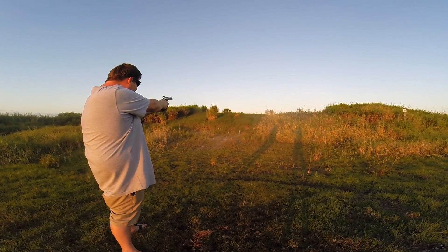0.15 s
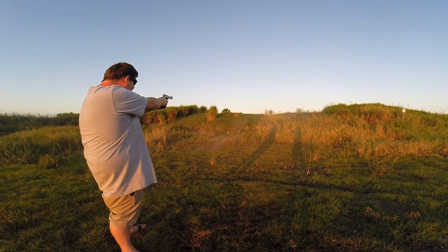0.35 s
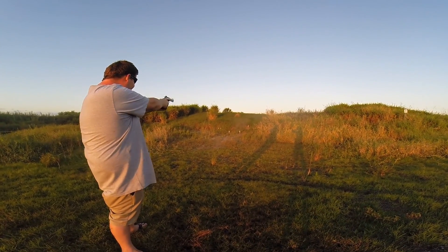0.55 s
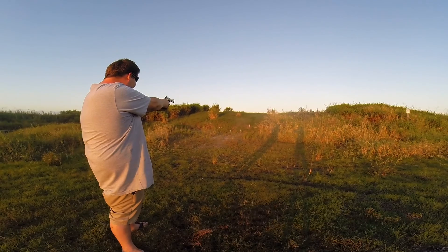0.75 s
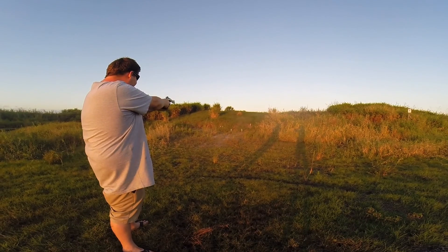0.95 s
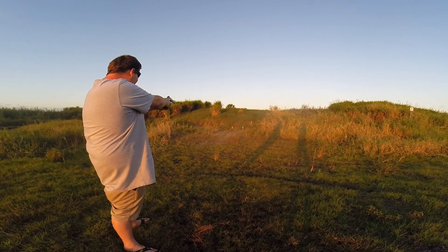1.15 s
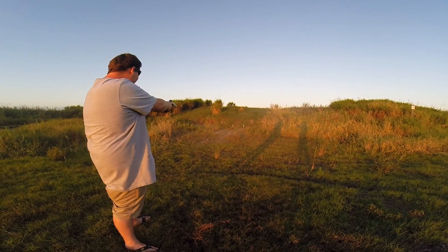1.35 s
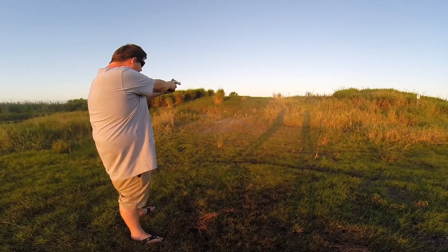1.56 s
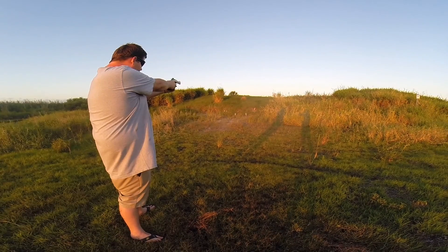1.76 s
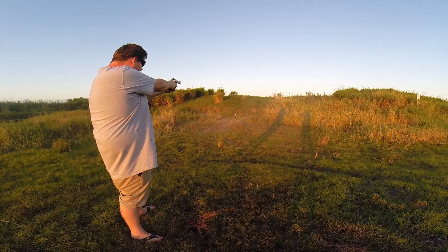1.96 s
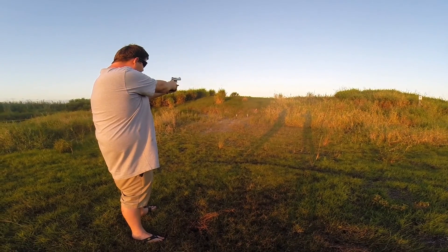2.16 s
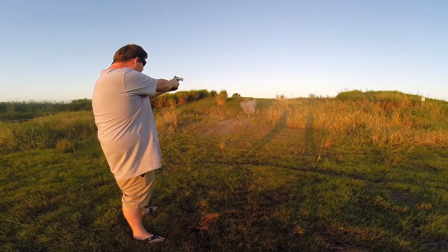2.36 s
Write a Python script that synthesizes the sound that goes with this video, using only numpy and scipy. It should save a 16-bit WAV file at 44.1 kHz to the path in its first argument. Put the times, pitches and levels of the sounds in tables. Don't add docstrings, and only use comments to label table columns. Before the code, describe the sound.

A pistol fires near a small outdoor microphone, its harsh crack distorting and then rolling away as a dull echo. Quiet breeze, a thin insect and a few birds follow before a second similar shot.

```python
import sys
import numpy as np
from scipy import signal
from scipy.io import wavfile

SR = 44100
rng = np.random.default_rng(int(sys.argv[2]) if len(sys.argv) > 2 else 0)


def volts_from_db(level):
    exponent = np.asarray(level, float) / 20
    return 10 ** exponent


def wav_out(sig):
    wavfile.write(sys.argv[1], SR, np.round(np.clip(np.atleast_2d(sig).T, -1, 1) * 32767).astype(np.int16))


N = 110250
T = np.arange(N) / SR
COARSE_STEP = 40
COARSE = np.arange(N // COARSE_STEP + 2) * COARSE_STEP / SR

# (time [s], housing ring [dB], middle swing [dB], low gas swing [dB], low swing crest delay [s])
SHOTS = [
    (0.2152, 8.5, -8, -1.5, 0.0065),
    (2.2041, -3, 0.5, 0, .0041),
]


def rms_one(x):
    return x / np.sqrt(np.mean(x ** 2) + 1e-20)


def at_hz(points, hz):
    table_hz, values = np.array(points).T
    return np.interp(np.log(hz), np.log(table_hz), values)


def fine(slow):
    return np.interp(T, COARSE, slow)


def drift(rate_hz):
    r = np.exp(-2 * np.pi * rate_hz * COARSE_STEP / SR)
    white = rng.standard_normal(len(COARSE) + 2000)
    return rms_one(signal.lfilter([1], [1, -2 * r, r * r], white)[2000:])


def band(x, low_hz, high_hz):
    sos = signal.butter(2, [low_hz, min(high_hz, .46 * SR)], "band", fs=SR, output="sos")
    return signal.sosfilt(sos, x)


def ring(clicks, hz, t60_s):
    r, w = volts_from_db(-60 / (t60_s * SR)), 2 * np.pi * hz / SR
    return signal.lfilter([0, np.sin(w)], [1, -2 * r * np.cos(w), r * r], clicks + 1e-18)


def swell(t, rise_s, hold_s, t60_s):
    return np.clip(t / rise_s, 0, 1) * volts_from_db(-60 * np.clip(t - rise_s - hold_s, 0, None) / t60_s)


def bank_of_noise(gain_at):
    white = rng.standard_normal((2, N + 8000))
    edges_hz = 20 * 2 ** (np.arange(30) / 3)
    out = np.zeros(N)
    for k, (low_hz, high_hz) in enumerate(zip(edges_hz, edges_hz[1:])):
        gain = fine(gain_at(np.sqrt(low_hz * high_hz)))
        out += gain * band(white[k % 2], low_hz, high_hz)[-N:]
    return out


def per_hz(spectrum, hz):
    grid_hz = np.linspace(20, SR / 2, 2000)
    return volts_from_db(at_hz(spectrum, hz)) / np.sqrt(np.mean(volts_from_db(at_hz(spectrum, grid_hz)) ** 2))


def housing(x):
    # (frequency [Hz], width [Hz], level [dB])
    resonances = [(1260, 230, -3), (2430, 450, -7)]
    out = x
    for hz, width_hz, db in resonances:
        r = np.exp(-np.pi * width_hz / SR)
        b = (1 - r * r) / 2
        a = [1, -2 * r * np.cos(2 * np.pi * hz / SR), r * r]
        out = out + volts_from_db(db) * signal.lfilter([b, 0, -b], a, x)
    return out


def air():
    # (frequency [Hz], level [dB])
    air_spectrum = [(15, -34), (25, -4), (75, 1), (113, -8), (1300, -26.5), (2770, -28.5), (8130, -39),
                    (8810, -37.5), (15500, -57)]
    # (time [s], level [dB])
    gust_levels = [(0.0, -56.5), (0.25, -57), (0.53, -61.5), (1.13, -56.5), (1.32, -54), (1.66, -58),
                   (2.12, -55.5), (2.34, -61.5), (2.5, -62.5)]
    # (frequency [Hz], gain [dB])
    duck_depth = [(40, -9.5), (150, -0.5), (1000, -5), (4000, -3), (10000, -16)]
    air_db, duck_hold_s, duck_release_s = -52.5, 0.52, 0.23
    insect_hz, insect_width_hz, insect_db = 9010, 120, -73
    t = COARSE
    ducked = np.zeros(len(t))
    for s, *_ in SHOTS:
        release = np.clip(1 - (t - s - duck_hold_s) / duck_release_s, 0, 1)
        ducked += np.clip((t - s) / .01, 0, 1) * release
    gust_db = np.interp(t, *np.transpose(gust_levels))
    wind_db = gust_db - gust_db.mean() + 2.5 * drift(9)

    def gain(hz):
        wind_share = at_hz([(120, 0.99), (500, .1)], hz)
        db = air_db + at_hz(duck_depth, hz) * ducked + 1.2 * drift(6) + wind_share * wind_db
        return per_hz(air_spectrum, hz) * volts_from_db(db)

    hiss = bank_of_noise(gain)
    white = rng.standard_normal(N)
    song = rms_one(band(white, insect_hz - insect_width_hz, insect_hz + insect_width_hz))
    resumed = np.clip((t - 1.1) / .5, 0, 1)
    startled_db = np.where(t < .3, -3, -7 * (2 - resumed))
    song_db = insect_db + 1.5 * drift(25) + at_hz(duck_depth, insect_hz) * ducked + startled_db
    return hiss + song * fine(volts_from_db(song_db))


def ticks():
    # (time [s], peak level [dB], main mode [Hz])
    contacts = [
        (.18355, -31.5, 3530),
        (.20715, -33, 2900),
        (2.17395, -29, 3480),
        (2.19595, -34.5, 2900),
    ]
    # (frequency [Hz], level [dB], t60 [s])
    steel_modes = [(2310, -12.5, .006), (4600, -10, .006), (7500, -8, 0.01), (9300, -11, 0.008),
                   (10500, -9.5, 0.009), (13500, -17, .005), (6000, -14, .005)]
    main_t60_s, spread_s, echo_s, echo_db = .006, .0028, .005, -16
    count = 7
    at = (np.linspace(0, 1, count) ** 1.3 * spread_s * SR).astype(int)
    lag = int(echo_s * SR)
    out = np.zeros(N)
    for s, db, main_hz in contacts:
        i = int(s * SR)
        for hz, mode_db, t60_s in [*steel_modes, (main_hz, 0, main_t60_s)]:
            hit_db = db + mode_db - np.linspace(1, 9, count) + rng.normal(0, 2.5, count)
            clicks = np.zeros(N // 50)
            clicks[at] = volts_from_db(hit_db) * rng.choice([-1, 1], count)
            one = ring(clicks, hz, t60_s)
            out[i:i + len(one)] += one
            out[i + lag:i + lag + len(one)] += volts_from_db(echo_db) * one
    return out


def blast():
    crack_s, crack_db = .0004, 2
    fizz_hz, fizz_db, fizz_t60_s = 4800, -7.5, 0.0092
    body_hz, body_after_s = 1058, 0.0019
    bounce_hz, bounce_after_s, bounce_db, bounce_fizz_db = 1549, .0042, 4.5, -9
    mid_hz, mid_peak_s = 482, 0.0034
    swing_hz, swing_t60_s = 199.6, 0.054
    limit_after_s, limit_db, limit_attack_s = .0062, -20.5, 0.003
    suction_db, suction_s = -12.5, 0.0024
    thud_hz, thud_after_s, thud_db = 403, .0646, -17.5
    tau = 2 * np.pi
    t = T[:SR // 8]
    u, v = t - body_after_s, t - bounce_after_s
    out = np.zeros(N)
    for s, body_db, mid_db, swing_db, swing_peak_s in SHOTS:
        crack = volts_from_db(crack_db) * -np.sin(tau * t / crack_s) * swell(t, crack_s, crack_s / 2, 0.0027)
        fizz_level = volts_from_db(fizz_db) * swell(t, 0.0011, 0.0011, fizz_t60_s)
        fizz_level += volts_from_db(bounce_fizz_db) * swell(v, 0.00082, .0015, fizz_t60_s)
        fizz = fizz_level * rms_one(band(rng.standard_normal(len(t)), fizz_hz / 2.5, fizz_hz * 1.6))
        body = volts_from_db(body_db) * np.sin(tau * body_hz * u) * swell(u, .0003, 0.0018, .006)
        bounce = volts_from_db(bounce_db) * np.sin(tau * bounce_hz * v) * swell(v, .0006, .0015, 0.0067)
        mid = volts_from_db(mid_db) * np.cos(tau * mid_hz * (t - mid_peak_s))
        mid *= swell(t - .0015, 0.0014, 0.0013, 0.014)
        swing = volts_from_db(swing_db) * np.cos(tau * swing_hz * (t - swing_peak_s))
        swing *= swell(t - .001, 0.006, 0.0017, swing_t60_s)
        shut = 1 - np.exp(-np.clip(t - limit_after_s, 0, None) / limit_attack_s)
        loud = (crack + fizz + body + bounce + mid + swing) * volts_from_db(limit_db * shut)
        suction = volts_from_db(suction_db) * t / suction_s * np.exp(1 - t / suction_s)
        q = thud_hz * (t - thud_after_s)
        thud = volts_from_db(thud_db) * np.cos(tau * q) * np.exp(-np.where(q < 0, 3 * q * q, 2.2 * q))
        out[int(s * SR):][:len(t)] += loud - suction + thud
    return out


def echoes():
    # (delay [s], rise [s], hold [s], level [dB], t60 at 1 kHz [s])
    returns = [
        (.006, 0.0011, 0.0019, -24, .055),
        (0.01, 0.014, 0.044, -40.5, 1.46),
        (0.189, 0.023, 0.044, -36, 0.61),
        (0.264, 0.13, 0.044, -47.5, 2.7),
        (0.714, .05, 0.024, -60, 1.2),
        (0.053, 0.0084, .018, -38.5, 0.11),
    ]
    treble_shares = [.6, 0.41, .35, 0.29, 1, .5]
    # (frequency [Hz], level [dB])
    grass = [(35, -44.5), (60, -16.5), (248, 0), (521, -7), (1070, -4.5), (1550, -11.5), (3190, -9.5),
             (9740, -23.5), (15500, -37)]
    # (frequency [Hz], level [dB])
    earth_bank = [(35, -64), (60, -27), (196, -2), (721, -22.5), (1230, -4), (1910, -14), (2590, -13),
                  (7540, -22), (15500, -40.5)]
    # (frequency [Hz], level [dB])
    trees = [(59, -37), (100, -4), (193, 4.5), (287, -12), (410, -41), (633, -12), (1200, -3),
             (5310, -29.5), (9000, -32.5), (11700, -76), (19800, -120)]
    colours = [grass, grass, earth_bank, trees, earth_bank, grass]
    lumps = drift(60)

    def gain(hz):
        power = np.zeros(len(COARSE))
        for (delay_s, rise_s, hold_s, db, t60_s), share, colour in zip(returns, treble_shares, colours):
            band_t60_s = t60_s * at_hz([(1000, 0.98), (10000, share)], hz)
            level = volts_from_db(db) * per_hz(colour, hz)
            for s, *_ in SHOTS:
                power += (level * swell(COARSE - s - delay_s, rise_s, hold_s, band_t60_s)) ** 2
        return np.sqrt(power) * volts_from_db(1.1 * lumps + 1.5 * drift(8) + 1.7 * drift(40))

    return housing(bank_of_noise(gain))


def birds():
    # (time [s], length [s], level [dB], pitch [Hz], glide [Hz])
    chips = [
        (1.335, 0.024, -71, 3770, -100),
        (1.38, .03, -71.5, 2922, 0.5),
        (1.435, .035, -73, 3660, -49),
        (1.519, 0.024, -56.5, 2690, -100),
        (1.543, 0.023, -67.5, 2820, 48),
        (1.707, .022, -63, 3610, 149),
        (1.952, .032, -65, 3590, -100),
    ]
    # (length [s], level [dB])
    chip_click = (0.021, -57)
    click_at_s = 1.521
    twitter_at_s, twitter_db, twitter_rise_s, twitter_t60_s = 1.1, -68, .25, 1.2
    trill_at_s, trill_length_s, trill_db, trill_per_s = 1.812, .127, -57.5, 75
    trill_hz, trill_sag_hz, trill_swing_hz, trill_throb = 3200, 450, 350, .95
    out = np.zeros(N)
    for s, length_s, db, hz, glide_hz in chips:
        x = np.clip((T - s) / length_s, 0, 1)
        pitch_hz = hz + glide_hz * (x - .5) + 90 * fine(drift(150))
        level = volts_from_db(db + 7) * np.sin(np.pi * x ** 0.99) * fine(volts_from_db(3.7 * drift(125)))
        out += level * np.sin(2 * np.pi * np.cumsum(pitch_hz) / SR)

    length_s, db = chip_click
    click = rms_one(band(rng.standard_normal(N), 1700, 4300))
    out += volts_from_db(db) * swell(T - click_at_s, 0.0016, length_s / 2, 3 * length_s) * click

    twitter = fine(volts_from_db(2.9 * drift(30))) * rms_one(band(rng.standard_normal(N), 2400, 4700))
    out += volts_from_db(twitter_db) * swell(T - twitter_at_s, twitter_rise_s, 0.11, twitter_t60_s) * twitter

    x = np.clip((T - trill_at_s) / trill_length_s, 0, 1)
    wave = np.cos(2 * np.pi * trill_per_s * (T - trill_at_s - .006))
    pitch_hz = trill_hz - trill_sag_hz * x - trill_swing_hz * wave + 60 * fine(drift(150))
    level = volts_from_db(trill_db) * np.sin(np.pi * x ** 1.1) ** 0.34 * (1 + trill_throb * wave)
    return out + level * np.sin(2 * np.pi * np.cumsum(pitch_hz) / SR)


def scene():
    return (blast() + echoes() + ticks() + air() + birds())[None]


def low_pass(x):
    return signal.sosfilt(signal.butter(12, 16450, fs=SR, output="sos"), x)


def record(dry):
    clipped = dry / (1 + np.abs(dry) ** 5) ** (1 / 5)
    top_cut = signal.cheby2(10, 60, 16300, fs=SR, output="sos")
    mix = signal.sosfilt(top_cut, clipped)
    return low_pass(mix)


dry = scene()
out = record(dry)
wav_out(out)
```